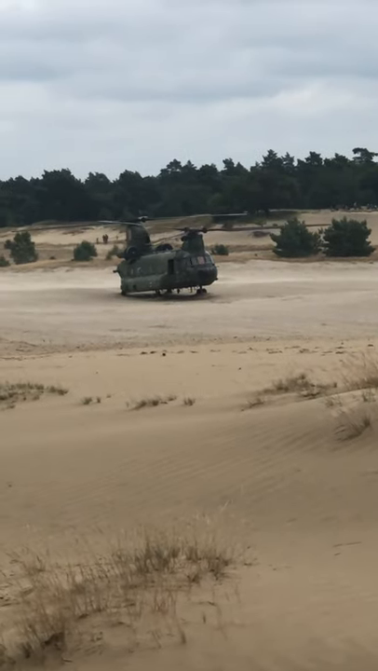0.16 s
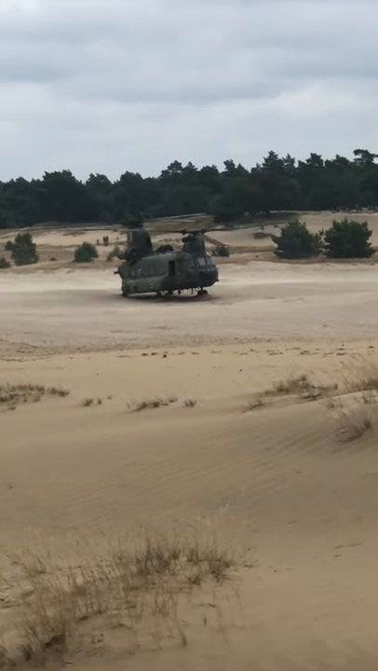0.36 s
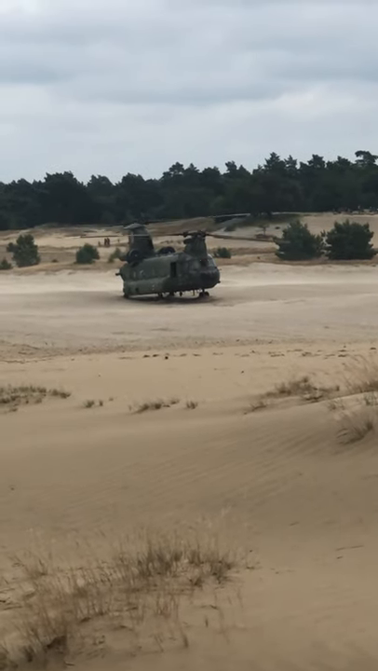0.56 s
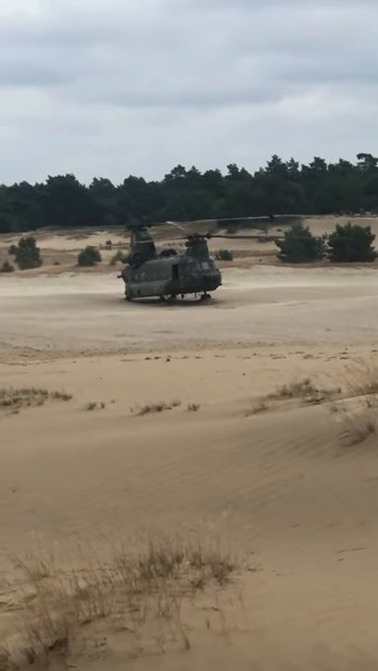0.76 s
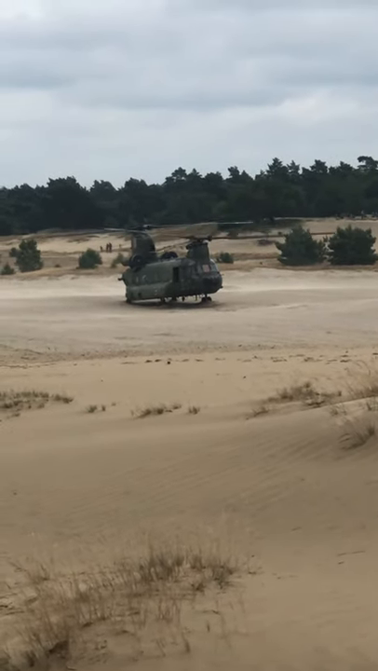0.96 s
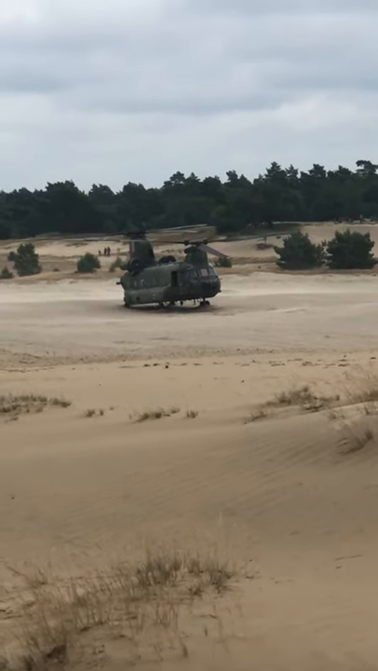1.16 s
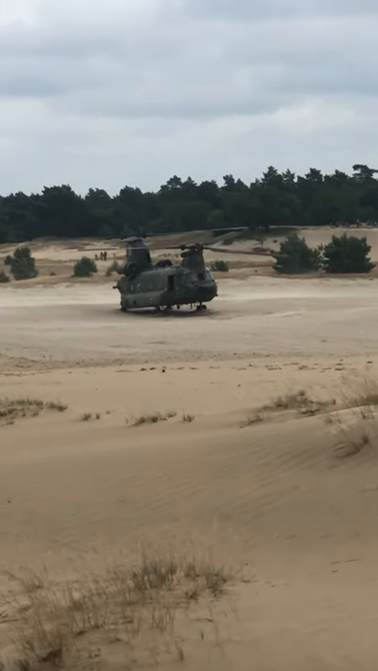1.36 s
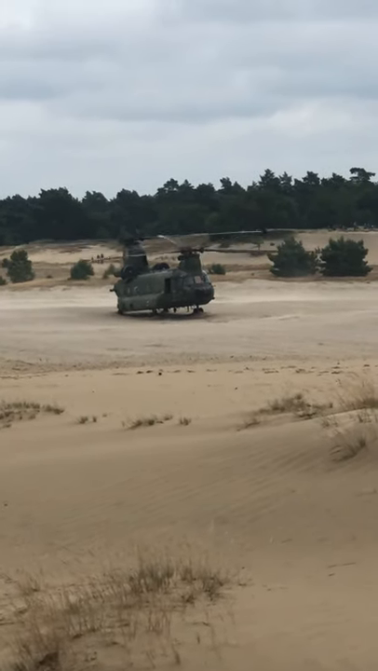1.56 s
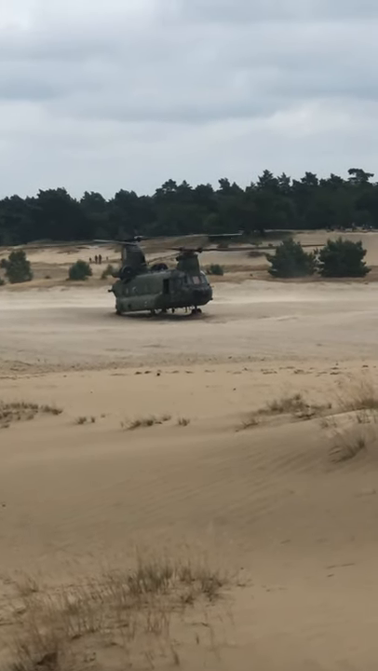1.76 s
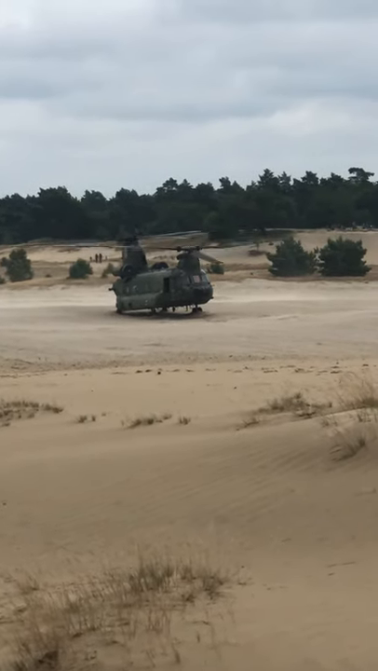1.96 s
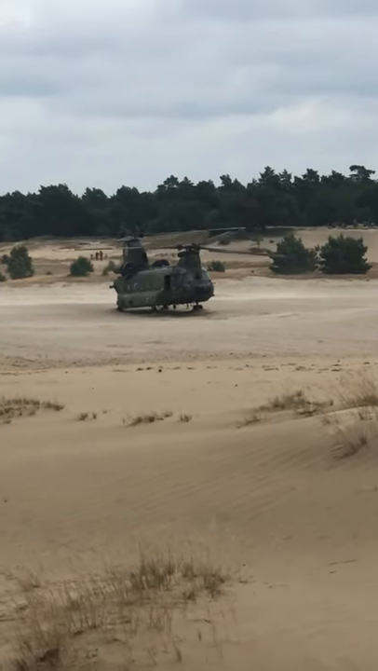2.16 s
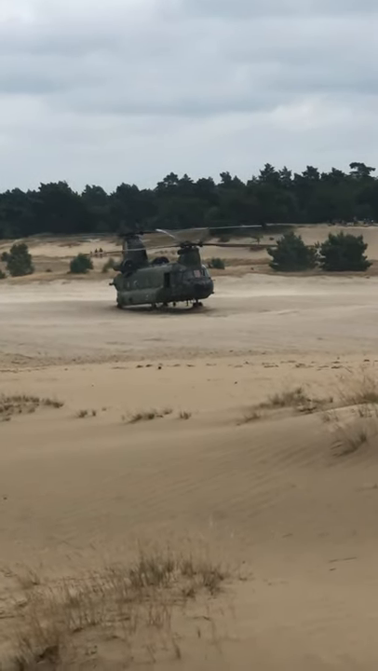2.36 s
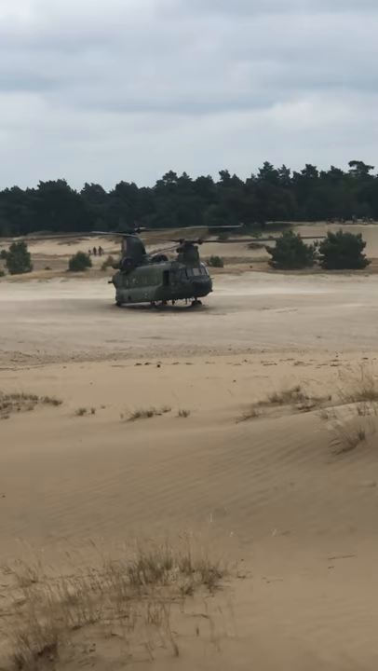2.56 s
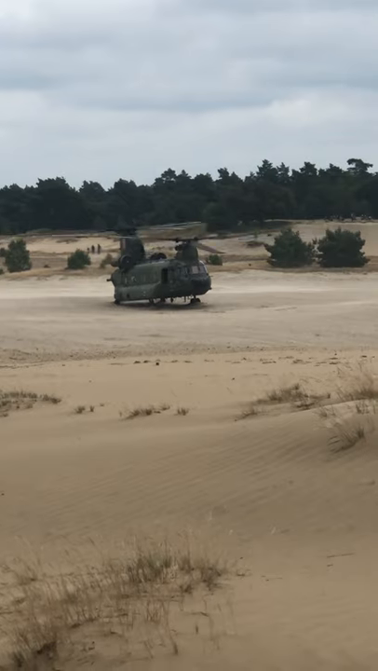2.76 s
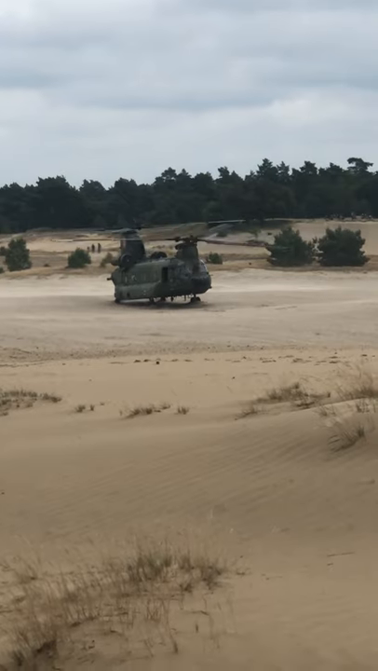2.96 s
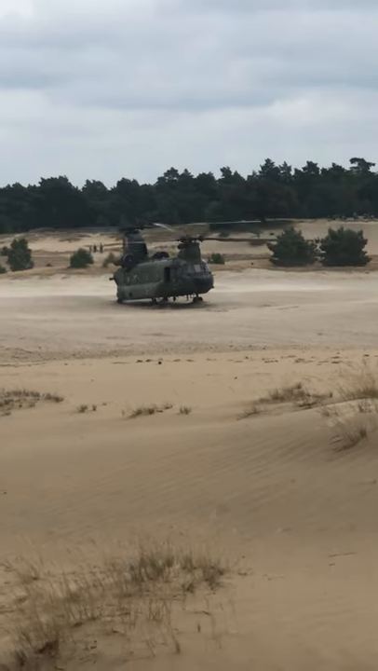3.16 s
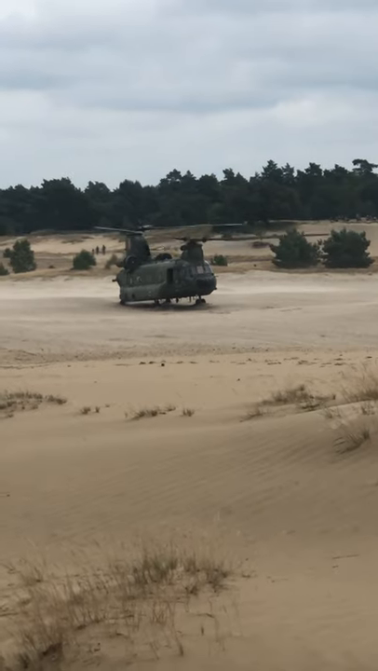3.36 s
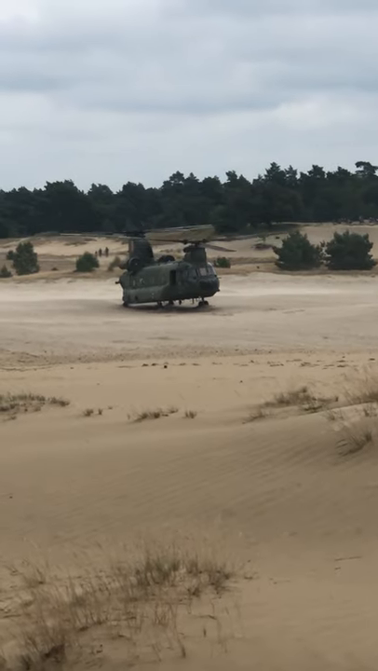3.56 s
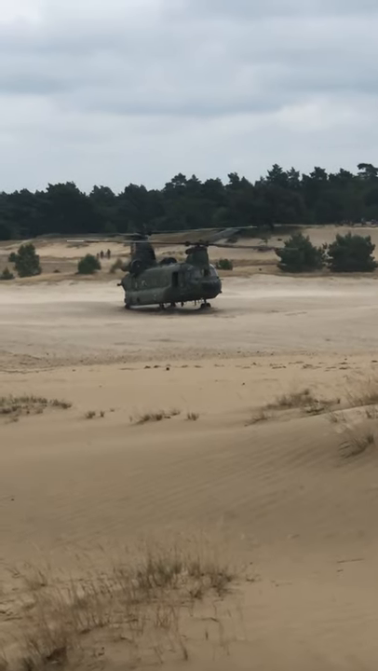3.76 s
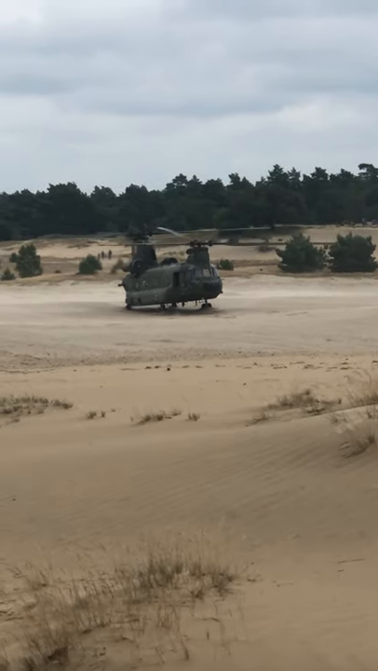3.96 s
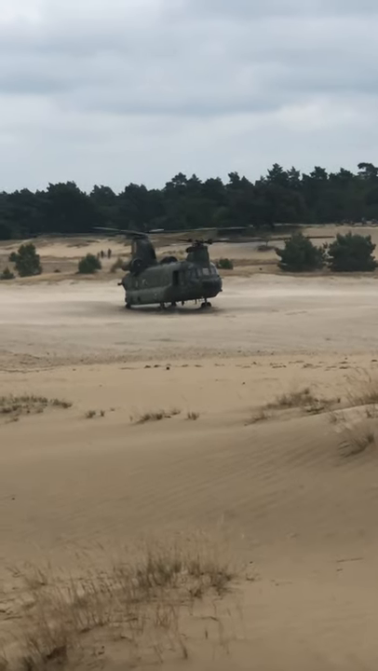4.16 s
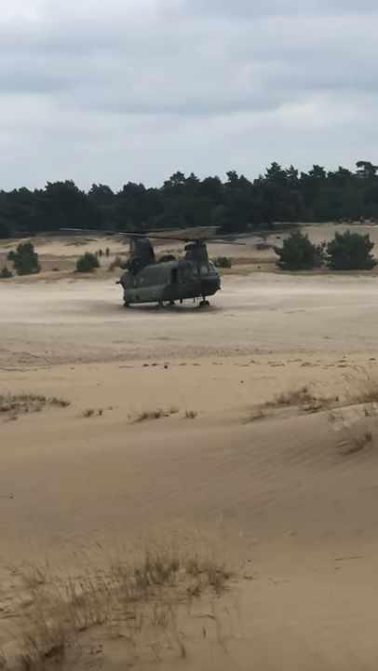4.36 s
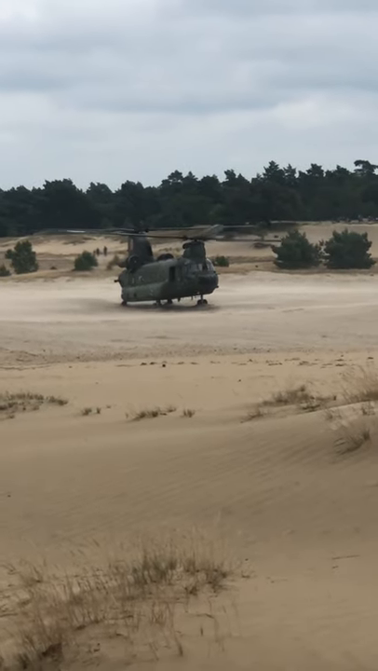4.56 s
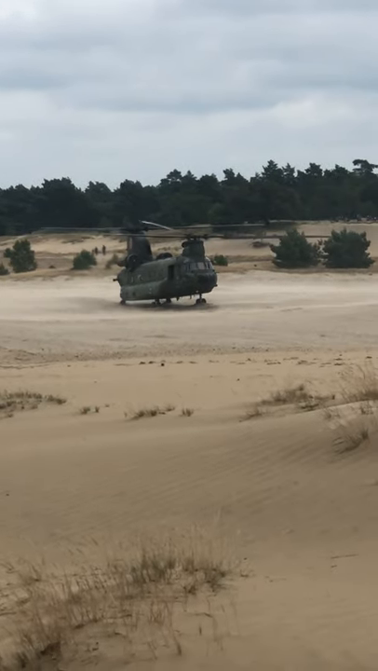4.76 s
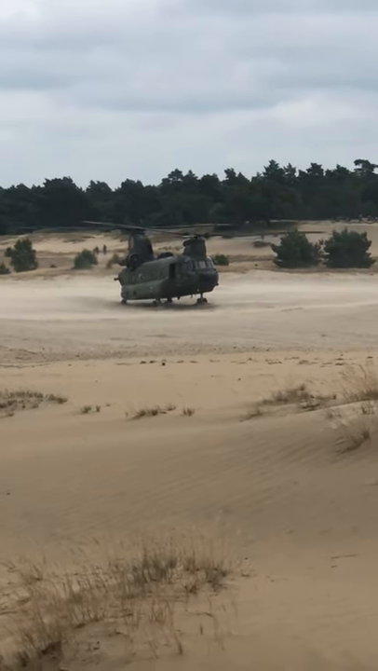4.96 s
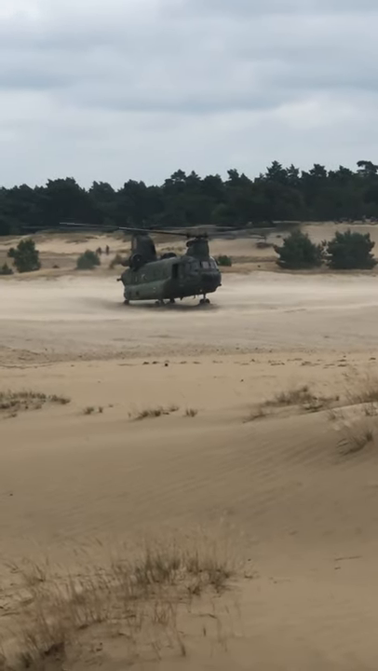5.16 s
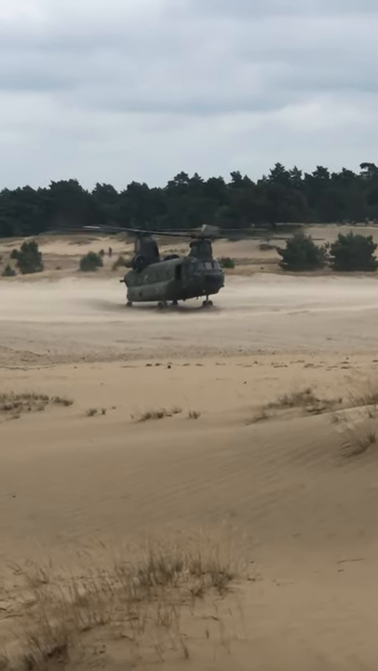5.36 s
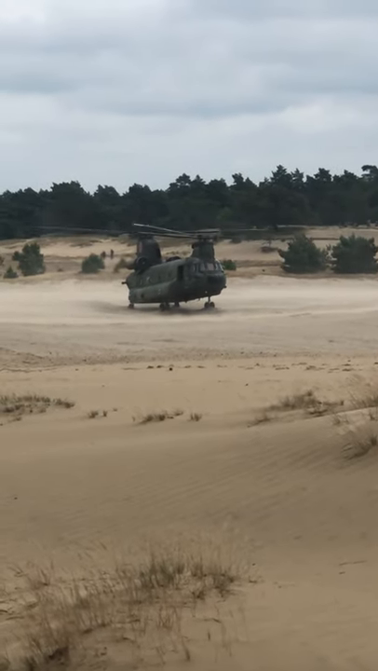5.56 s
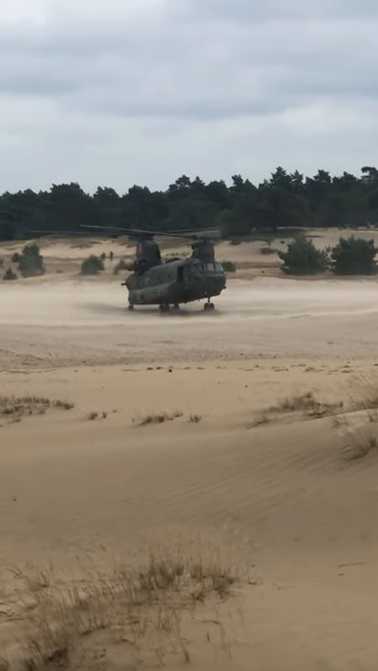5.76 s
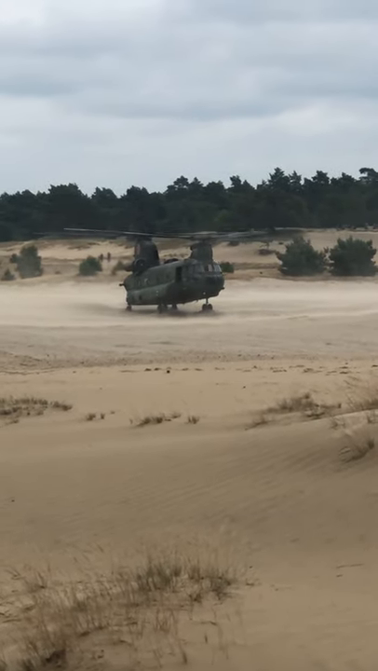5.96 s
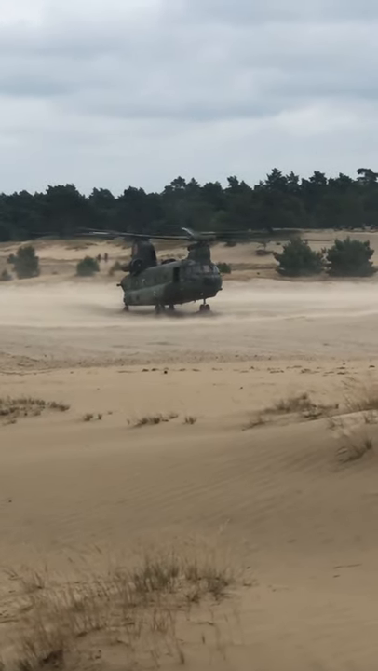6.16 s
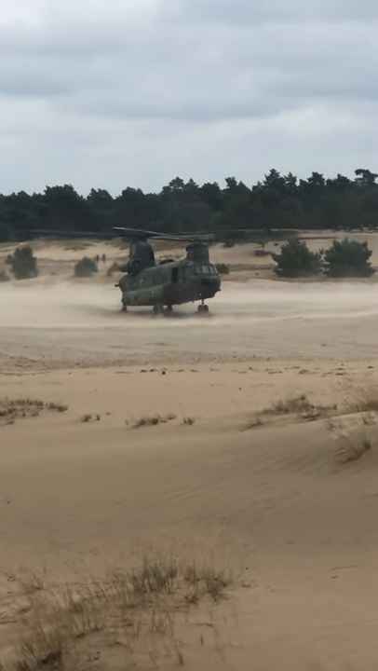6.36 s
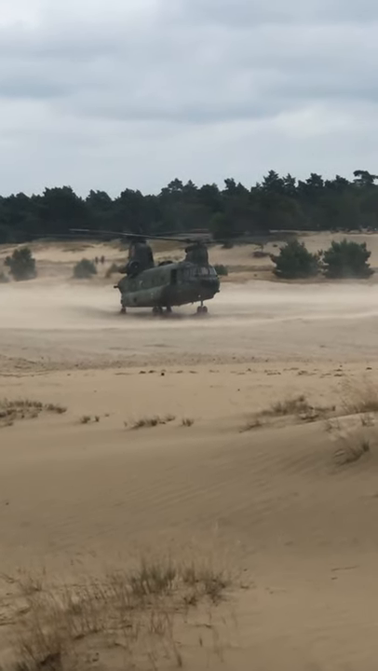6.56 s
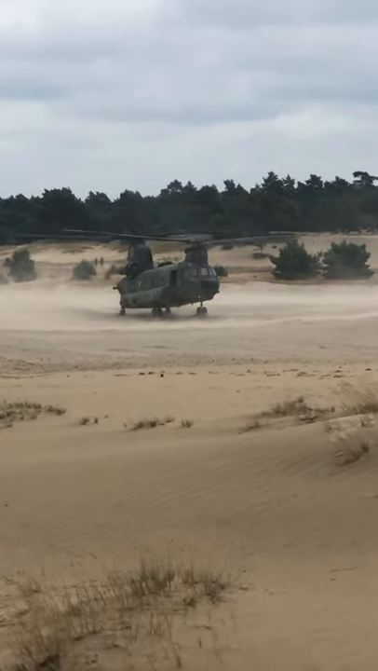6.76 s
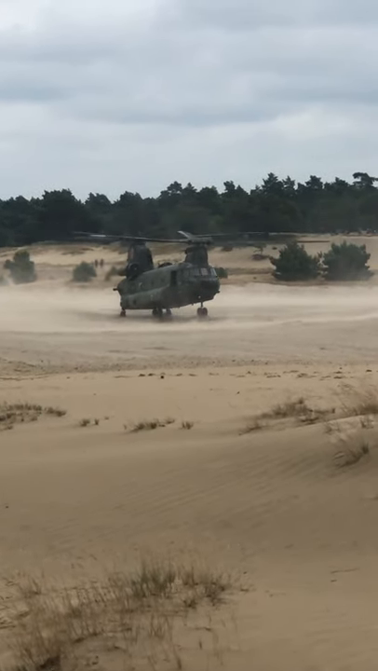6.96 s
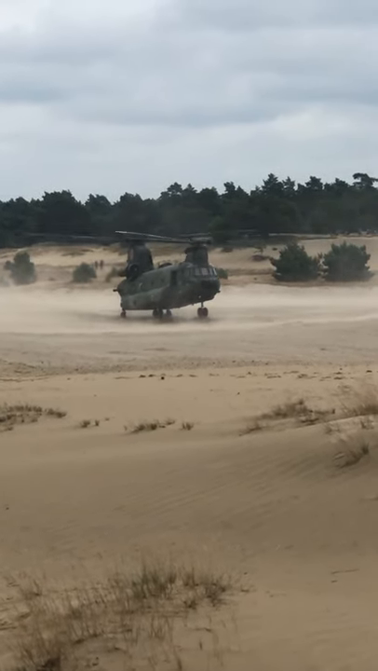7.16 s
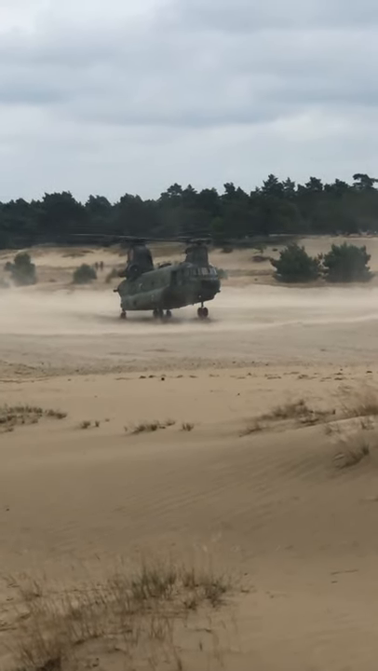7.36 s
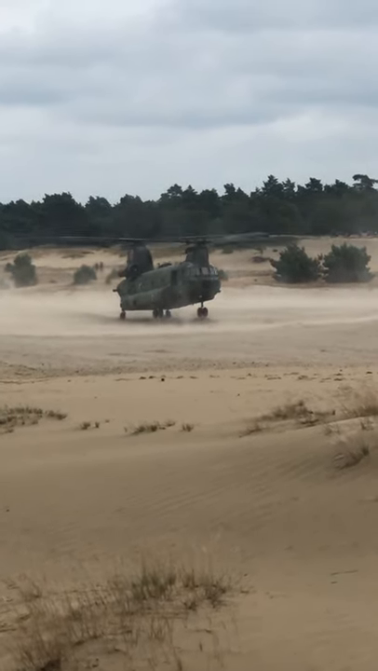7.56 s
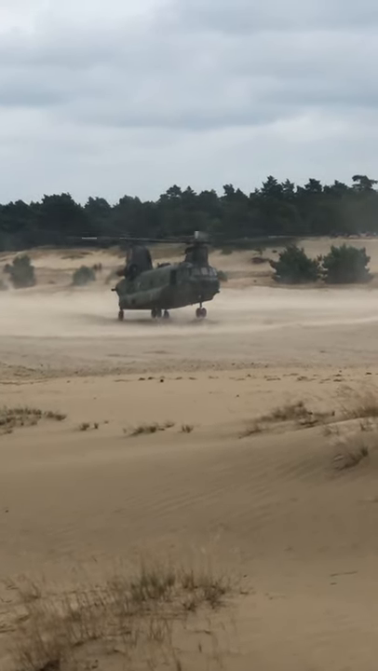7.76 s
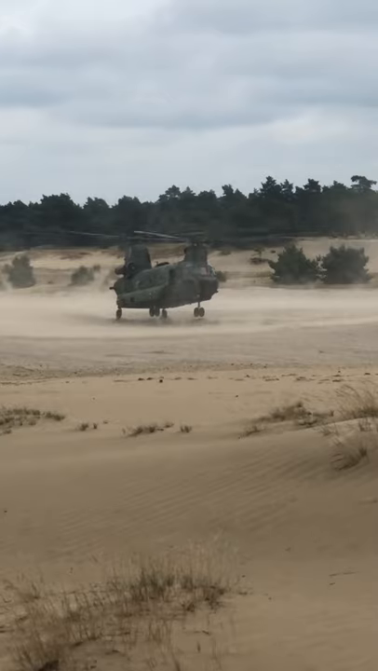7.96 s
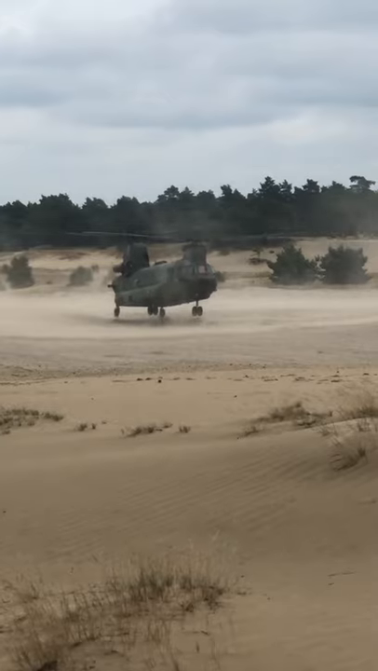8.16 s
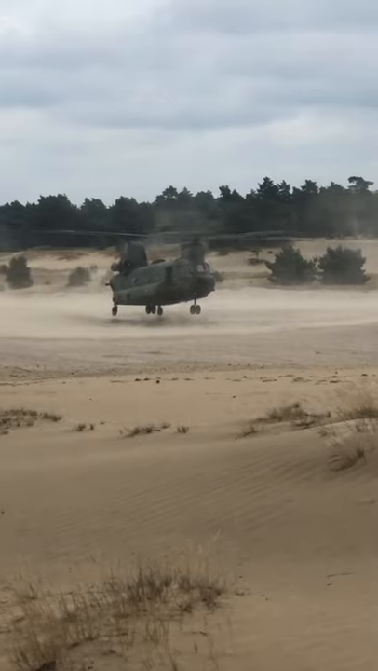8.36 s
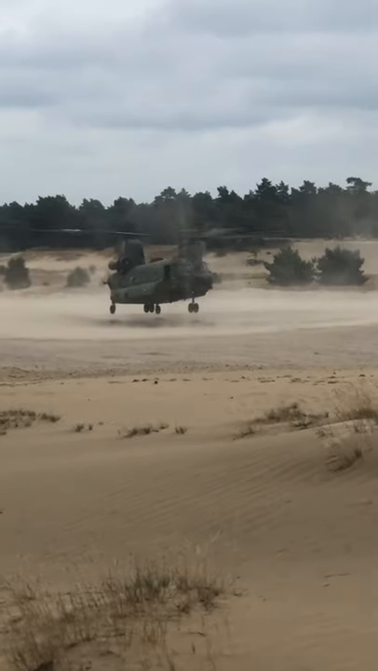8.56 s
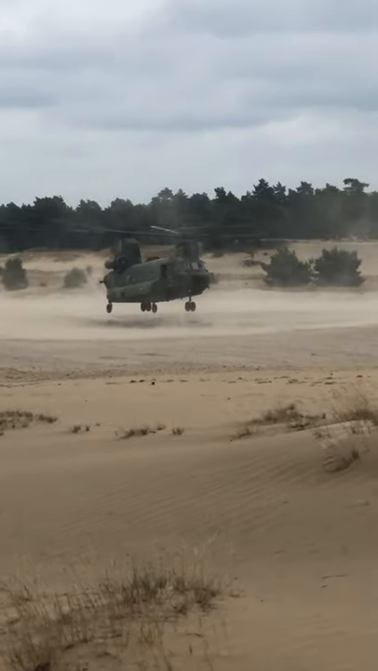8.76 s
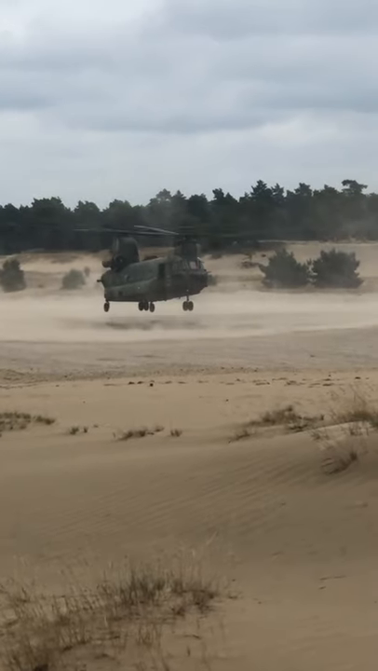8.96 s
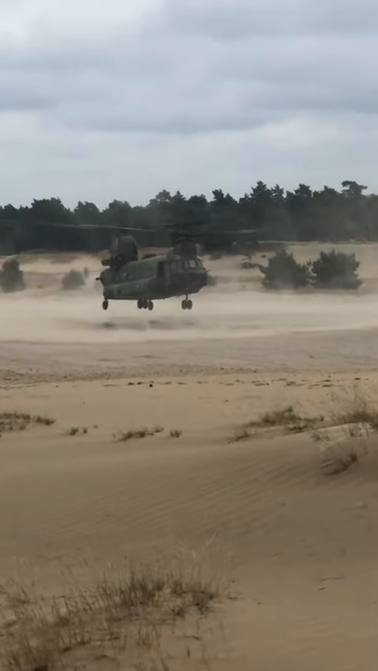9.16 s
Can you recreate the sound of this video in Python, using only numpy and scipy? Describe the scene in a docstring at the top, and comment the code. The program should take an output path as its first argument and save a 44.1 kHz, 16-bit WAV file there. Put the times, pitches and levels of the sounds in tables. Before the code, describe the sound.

A large twin-rotor helicopter beats steadily at about eleven thumps a second across open sand, whining and cracking, then swells deeper and heavier lifting off.

```python
"""Tandem-rotor helicopter lifting off

Some way off across sand dunes, the helicopter runs at full rotor speed, pulls power and lifts off.
Every blade pass brings a thump from each rotor, slaps where a blade cuts the other rotor's tip vortices,
and a wash of eddies that nearly repeats. Gearbox tones follow the rotor, the turbine whine climbs unevenly
and spreads with power, the exhausts hiss and sand blows in the downwash."""
import sys
import numpy as np
from scipy import signal
from scipy.fft import rfft, irfft, next_fast_len
from scipy.io import wavfile
from scipy.ndimage import uniform_filter1d

SR = 44100
rng = np.random.default_rng(int(sys.argv[2]) if len(sys.argv) > 2 else 0)


def unload_audio(sound):
    """Save the sound as a 16-bit wav file, at the path given as the first command line argument."""
    columns = np.transpose(np.atleast_2d(sound))
    # keep every value between -1 and 1, then stretch to whole-number steps
    steps = np.round(np.clip(columns, -1, 1) * 32767)
    wavfile.write(sys.argv[1], SR, steps.astype(np.int16))


N = 410130
TIME = np.arange(N) / SR  # s

# The power the pilot pulls, lightening the wheels and then lifting off.
# Each row: time in seconds, pull from 0 to 1.
PULL = [(0, 0.03), (3.9, 0.07), (4.7, 0.47), (5.7, 0.63), (6.3, 0.88), (7.45, 0.68), (8.05, 0.87),
        (8.6, 0.94), (9.3, 1)]
# Where in a blade pass the wake is met; it shifts as the discs tilt.
# Each row: time in seconds, then front thud, rear thud and slap in passes.
TIMING = [(0, 0.17, 0.51, 0.33), (3.6, 0.21, 0.5, 0.33), (4.2, 0.18, .6, .47), (5.1, 0.17, 0.61, 0.46),
          (5.7, .16, .44, .39), (7.1, 0.17, 0.44, 0.35), (7.75, .17, .61, .31), (8.2, 0.16, 0.55, .295),
          (8.6, 0.13, .56, .29), (9.3, 0.14, 0.53, 0.3)]
# Swing of the treble, shared by the top of the tearing, the exhaust hiss and the faint gear tones.
# Each row: time in seconds, level in relative dB.
TREBLE = [(0, 4.5), (.39, 1.5), (.6, 0), (2.2, 0), (3.6, -2), (5.6, -5.5), (6.4, -0.5), (7.7, 0),
          (9.3, 1.25)]
# Colour of torn air. Each row: frequency in Hz, relative level in dB.
TEAR = [(300, -12.5), (640, 6), (850, 7), (1300, -2.5), (2200, -14.5), (4000, -28.5), (8000, -40.5),
        (14000, -61.5)]
# Under load the blows grow compact: the clean pulse gains this much on its smear at full pull
FOCUS_DB = 5.5
# The blades meet the wake more or less squarely from moment to moment
WANDER_DB = 0.24


def blade_slaps(phase):
    """Blades cut tip vortices: a crack, two thuds and a slap in every pass, some hit harder than the rest."""
    # Blades that hit a vortex squarely. Each row: time in seconds, extra level in dB.
    square_hits = [(0.298, 1.5), (0.386, 0.5), (1.015, 1.5), (1.103, 3), (1.2, 2.5), (1.38, 1), (1.47, 4),
                   (2.0, 2.5), (2.53, 6.5), (2.62, 2.5), (3.211, 5.5), (3.39, 1), (4.806, 1), (4.895, 3.5),
                   (5.113, 5.5), (5.55, 5), (6.598, 4.5), (6.862, 4.5), (7.045, 5), (7.489, 4),
                   (7.577, 5.5), (7.69, 3), (7.755, 4), (7.842, 3), (7.87, 3), (7.931, 2), (8.028, 3.5),
                   (8.293, 1), (8.564, 1.5), (8.745, 1.5), (8.925, 0.5)]
    blows = cracks(phase) + thuds(phase) + slaps(phase) + lift_blows(phase)
    return blows * undb(accents(square_hits, width_s=0.014)) + snaps()


def cracks(phase):
    """A scuff and a swish, then a clean crack of fixed body colour whose bright edge changes over time."""
    # The crack is strongest while the aircraft is light on its wheels.
    # Each row: time in seconds, level of the crack group in dB, lift of its bright edge in dB.
    cracking = [(0, -40.5, 4), (2.4, -45, -4.5), (3.55, -48, 16.5), (4.15, -31, -15), (4.75, -30, -10),
                (5.4, -30, -13.5), (6.3, -34, -6), (6.7, -33.5, 4.5), (7.2, -29, -13), (7.6, -42, -5),
                (9.3, -42, -9.5)]
    # Colour of the crack. Each row: frequency in Hz, relative level in dB.
    crack_colour = [(60, -27.5), (150, -1), (300, 8), (480, 7), (680, -7), (900, -6), (1400, -19),
                    (2400, -37.5), (5000, -62)]
    level_db, edge_db = curves(cracking)
    # grazing over soft sand delays the lows, so each crack is a short falling chirp
    crack = colour(pulses(phase, at=.077, jitter=.004, scatter_db=1), crack_colour, lag_s=.0045)
    smear = colour(wake(phase, memory=0.21) * sweep(phase, at=0.074, width=.022), crack_colour)
    scuff = colour(wake(phase, memory=0.19) * sweep(phase, at=0.99, width=.055), crack_colour)
    blow = brighten(undb(-7) * crack + undb(-15.0) * smear, edge_db, edge_hz=720)
    swish = colour(rng.standard_normal(N) * sweep(phase, at=0.04, width=0.068), TEAR)
    swish_db = -54 - 5.3 * curves(PULL)[0] + 2 * walk(14)
    return (blow + undb(-15) * scuff) * undb(level_db) + swish * undb(swish_db)


def thuds(phase):
    """A dull blow from each rotor, smeared by ground and fuselage; the front one repeats more closely."""
    # Front rotor. Each row: time in seconds, level in dB ahead of the mix of pulse and smear.
    front_level = [(0, -46), (3.9, -41.5), (4.7, -36.5), (5.7, -29.5), (7.5, -29.5), (8.2, -29.5),
                   (8.6, -31), (9.3, -43)]
    # The rear rotor thuds whenever it runs in the wake of the front one.
    # Each row: time in seconds, level in dB ahead of the mix of pulse and smear.
    rear_level = [(0, -58), (.9, -46), (1.15, -32), (1.5, -32), (1.8, -45), (2.35, -41), (2.6, -32.5),
                  (2.9, -34.5), (3.3, -41.5), (4.1, -46), (4.5, -37), (5.1, -30.5), (6, -34), (7.1, -33),
                  (7.75, -33), (8.4, -30.5), (9.3, -25.5)]
    front_at, rear_at, _ = curves(TIMING)
    focus = undb(FOCUS_DB * curves(PULL)[0] / 2)
    # a blade crosses two turns of the vortex in a row: (delay in passes, share)
    turns = [(0, 1), (.06, .5)]
    front_push = sum(share * pulses(phase, front_at + delay, jitter=.003, scatter_db=1)
                     for delay, share in turns)
    front_smear = thud(wake(phase, memory=0.8) * sweep(phase, front_at, width=0.08))
    front = undb(-3) * thud(front_push) * focus + undb(-5) * front_smear / focus
    rear_push = pulses(phase, rear_at, jitter=.014, scatter_db=1.5)
    rear_smear = thud(wake(phase, memory=0.35) * sweep(phase, rear_at, width=0.076))
    rear = undb(-4.0) * thud(rear_push) + undb(-2.0) * rear_smear
    front_db = curves(front_level)[0] + WANDER_DB * walk(9.3)
    return front * undb(front_db) + rear * undb(curves(rear_level)[0])


def thud(push):
    """A dull blow whose pitch rises with the load on the blades."""
    # A lightly loaded blade thuds lower than one that is pulling hard.
    # Each row of both: frequency in Hz, relative level in dB.
    light = [(30, -37.5), (60, -15), (115, 5), (155, 3), (230, -4.5), (300, -27), (500, -32.5),
             (1200, -60.5)]
    loaded = [(30, -37.5), (60, -14.5), (115, -7.5), (180, 1), (230, -1.5), (300, -16.5), (500, -26),
              (1200, -62)]
    load = np.clip(0.22 + 0.48 * curves(PULL)[0], 0, 1)
    return unit((1 - load) * colour(push, light) + load * colour(push, loaded))


def slaps(phase):
    """A ragged slap with a tearing edge, a quick run of small shocks."""
    # The slap grows as the rotors take the weight.
    # Each row: time in seconds, level in dB ahead of the mix of strike and smear.
    slapping = [(0, -50.5), (2.5, -39), (3.6, -47.5), (4.9, -36.5), (5.7, -37.5), (7.3, -36.5), (8, -29),
                (9.3, -29)]
    # The tearing comes and goes with the wake. Each row: time in seconds, level in dB.
    tearing = [(0, -52.5), (.38, -48), (.55, -49.5), (.8, -51), (1.05, -45.5), (1.25, -49.5), (1.45, -52.5),
               (1.95, -49.5), (2.7, -65.5), (3.8, -57), (4.2, -47), (5.5, -62), (5.95, -52), (6.55, -48),
               (7.45, -50.5), (7.7, -61.5), (8.05, -50.5), (9.05, -47), (9.3, -53)]
    # Colour of the slap. Each row: frequency in Hz, relative level in dB.
    slap_colour = [(80, -32.5), (220, 3.5), (380, 2.5), (480, 4), (590, -0.5), (700, -19.5), (900, -19),
                   (1600, -43)]
    slap_at = curves(TIMING)[2]
    pull = curves(PULL)[0]
    focus = undb(FOCUS_DB * pull / 2)
    strike = colour(pulses(phase, slap_at, jitter=.007, scatter_db=1.2), slap_colour, lag_s=.006)
    smear = colour(wake(phase, memory=0.58) * sweep(phase, slap_at + .04, width=0.061), slap_colour)
    slap = undb(-8.0) * strike * focus + undb(-4.0) * smear / focus
    slap_db = curves(slapping)[0] + WANDER_DB * walk(3.1)

    shocks = rng.standard_normal(N) * (rng.random(N) < 4000 / SR)  # 4000 a second ahead of the gate
    tear = colour(shocks * sweep(phase, at=0.35, width=0.072 + 0.022 * pull), TEAR, lag_s=0.00296)
    # the top of the tearing swings further than the shared treble: 3 dB per dB
    tear = brighten(tear, 3 * curves(TREBLE)[0], edge_hz=1330)
    return slap * undb(slap_db) + tear * undb(curves(tearing)[0])


def lift_blows(phase):
    """With full weight on the rotors each pass lands a compact blow; a brief shudder and round boom follow."""
    # Each row: time in seconds, level in dB of blow and shudder, ahead of the lift-off fade.
    lifting = [(7.3, -46), (7.55, -34), (7.84, -32), (7.93, -26.5), (8.02, -25.5), (8.11, -23),
               (8.2, -26.5), (8.47, -25.5), (8.56, -28.5), (8.85, -30), (9.3, -28)]
    # Colours of the blow and of the boom. Each row of both: frequency in Hz, relative level in dB.
    blow_colour = [(35, -18), (70, -3), (120, 1.5), (165, 2.5), (250, -4), (340, -15), (520, -23),
                   (900, -44)]
    boom_colour = [(40, -24.5), (68, 5), (100, -1), (140, -7.5), (260, -24)]
    lift_start_s, lift_rise_s = 7.31, 0.65
    airborne = np.clip((TIME - lift_start_s) / lift_rise_s, 0, 1)
    blow = colour(pulses(phase, at=.28, jitter=.003, scatter_db=.6), blow_colour)
    shudder = undb(-3) * colour(wake(phase, memory=.3) * sweep(phase, at=.38, width=.055), blow_colour)
    boom = colour(wake(phase, memory=.5) * sweep(phase, at=.54, width=.1), boom_colour)
    return airborne * ((blow + shudder) * undb(curves(lifting)[0]) + boom * undb(-33.5))


def snaps():
    """Single sharp cracks: a bright front, and a rounder body that the sand delays."""
    # Each row: time in seconds, peak of the front in dB, its centre frequency in Hz.
    fronts = [(2.498, -39, 1000), (4.453, -33, 1120), (4.541, -28.5, 700), (4.631, -35, 900),
              (4.718, -33, 1330), (4.807, -33, 840), (4.895, -30, 740), (4.984, -32, 1000),
              (5.072, -26.5, 890), (5.337, -39, 890), (5.778, -34, 800), (5.867, -31, 800),
              (6.042, -32, 800), (6.597, -42, 1200), (7.044, -36, 840), (7.193, -38, 990),
              (7.307, -36, 1040)]
    body_hz, body_db, lag_s = 520, -26, 0.001296
    return sum(undb(db) * shock(s, hz) + undb(body_db) * shock(s + lag_s, body_hz) for s, db, hz in fronts)


def shock(s, hz):
    """A rise and fall of pressure around time s; the shorter it is, the brighter."""
    u = np.clip(2 * np.pi * hz * (TIME - s), -10, 10)
    return -u * np.exp((1 - u ** 2) / 2)


def rotor_thump(phase):
    """The lift of the two rotors thumps once each in every pass, louder as the aircraft leaves the ground."""
    # Colour of the thump. Each row: frequency in Hz, relative level in dB.
    thump_colour = [(10, -49.5), (22, -30.5), (33, -9.5), (45, -2.5), (56, 5.5), (70, -3), (90, -7),
                    (130, -14.5), (300, -58.5)]
    start_db, rise_start_s, rise_db_per_s = -35.5, 5.4, 1
    front = pulses(phase, at=.27, jitter=.003, scatter_db=.8)
    rear = pulses(phase, at=.56, jitter=.003, scatter_db=.8)
    thump_db = start_db + rise_db_per_s * np.maximum(TIME - rise_start_s, 0)
    return colour(undb(-0.5) * front + rear, thump_colour) * undb(thump_db)


def rotor_wash(phase):
    """The wake of the rotors rumbles and roars in turbulent surges, one for each blade pass."""
    # Colours of rumble and roar. Each row of both: frequency in Hz, relative level in dB.
    eddy_colour = [(22, -36), (45, -13.5), (68, -1), (120, 2.5), (170, 1), (220, -4), (300, -18.5),
                   (600, -36.5)]
    roar_colour = [(100, -17.5), (260, 4), (430, 2.5), (560, -2), (690, -7.5), (880, -9.5), (1150, -17.5),
                   (1700, -24.5), (2400, -41), (5000, -49)]
    # Laws for the levels ahead of the surge, and for its height: dB at no pull, added dB at full pull.
    wash_law = (-33.3, -2)
    roar_law = (-41.5, 2.5)
    surge_law = (4.5, 8)
    surge_db = follow(PULL, surge_law) * sweep(phase, at=0.37, width=0.32)
    wash = colour(wake(phase, memory=0.45), eddy_colour) * undb(follow(PULL, wash_law) + surge_db)
    roar_db = follow(PULL, roar_law) + 0.62 * surge_db + 1.0 * walk(25)
    return wash + colour(wake(phase, memory=0.35), roar_colour) * undb(roar_db)


def exhaust_hiss():
    """Turbulent exhaust gas makes a broad hiss that wanders in level and follows the shared treble."""
    # Colour of the hiss. Each row: frequency in Hz, relative level in dB.
    hiss_colour = [(500, -0.5), (1800, 6), (2600, 0.5), (3600, -2.5), (4600, -6.5), (5400, -7.5),
                   (6200, -11.5), (8300, -15.5), (10500, -23.5), (15000, -31.5)]
    # Level law: base in dB, then dB per dB of treble.
    hiss_law = (-58, 0.6)
    return colour(rng.standard_normal(N), hiss_colour) * undb(follow(TREBLE, hiss_law) + 0.59 * walk(9))


def gearbox(speed):
    """Gear teeth sing in step with the rotors: three clear mesh tones and two faint blurred ones."""
    # Clear tones. Each row: frequency in Hz at the first rotor speed, pitch wobble in Hz.
    mesh_tones = [(1452, 14), (1790, 5), (3570, 11)]
    # Their mean levels. Each row: time in seconds, then low, middle and high tone in dB.
    mesh_levels = [(0, -56.5, -58, -70), (.4, -64, -66, -79), (1.1, -61.5, -67.5, -74),
                   (2.2, -66, -73, -77), (3.1, -63, -71.5, -78), (4.3, -66, -67.5, -78),
                   (5.4, -68.5, -77.5, -79), (7, -64, -73.5, -72.5), (7.9, -68.5, -73, -77.5),
                   (9.3, -61, -67, -78)]
    # Blurred tones. Each row: frequency in Hz at the first rotor speed, width in Hz,
    # level in dB ahead of the treble swing.
    blurred_tones = [(3335, 90, -80), (5365, 130, -81)]
    mesh = sum(whistle(hz * speed, wobble) * undb(db + 2.2 * walk(6))
               for (hz, wobble), db in zip(mesh_tones, curves(mesh_levels)))
    others = sum(tone(hz * speed, width) * undb(db + 1.5 * walk(8)) for hz, width, db in blurred_tones)
    return mesh + others * undb(0.37 * curves(TREBLE)[0])


def turbines():
    """The compressor blades whine: a narrow core in a skirt that gains on it as the engines spool up."""
    # Each row: time in seconds, blade tone in Hz, relative level in dB.
    compressor = [(0, 6640, -68), (3.45, 6640, -70), (4.2, 6870, -71.5), (5.05, 7060, -72),
                  (5.8, 7000, -69.5), (6.9, 6900, -68), (7.5, 7020, -66.5), (8.1, 7120, -66),
                  (9.3, 7400, -64.5)]
    hz, db = curves(compressor)
    power = (hz - hz.min()) / np.ptp(hz)
    spread = np.clip(0.12 + 0.5 * power, 0, 1)
    core = unit(tone(hz, width_hz=98) + whistle(hz, wobble_hz=23.9))
    whine = np.sqrt(1 - spread) * core + np.sqrt(spread) * tone(hz, width_hz=400)
    skirt = tone(hz, width_hz=800) * undb(-13 + 3 * power)
    # gusts on the long path make the whine flutter
    return (whine + skirt) * undb(db + 1.0 + .5 * walk(12))


def blown_sand(phase):
    """Sand grains hiss in gusts, faint until the downwash lifts more, surging with each blade pass."""
    # Colour of the sand. Each row: frequency in Hz, relative level in dB.
    grit = [(2000, -10), (4500, 5), (7000, -2), (9000, -6), (11000, -18.5), (15000, -27)]
    start_s, rise_s = 5, 0.98
    lifted = np.interp(TIME, [start_s, start_s + rise_s], [.2, 1])
    surge_db = 5 * sweep(phase, at=.35, width=.13)
    return colour(rng.standard_normal(N), grit) * lifted * undb(-71.5 + surge_db + 2.3 * walk(7.3))


def pulses(phase, at, jitter, scatter_db):
    """One pressure pulse in every blade pass, at the given point of it, each a little off in time and size."""
    passes = np.arange(int(phase[-1]) + 1)
    chance = rng.standard_normal((len(passes), 2))
    moments = passes + jitter * chance[:, 0]
    place = np.interp(moments, phase - at, np.arange(N), left=-1, right=-1).astype(int)
    heard = place >= 0
    out = np.zeros(N)
    # tanh holds back the rare extremes
    out[place[heard]] = undb(scatter_db * np.tanh(chance[heard, 1] / 2) * 2)
    return out


def wake(phase, memory):
    """Turbulence that every blade finds partly as the blade before it did; memory is the share that stays."""
    memory = np.clip(memory, 0, .97)
    size = 4096  # points in one pass
    eddies = rng.standard_normal((int(phase[-1]) + 2, size))
    for k in range(1, len(eddies)):
        eddies[k] = memory * eddies[k - 1] + np.sqrt(1 - memory ** 2) * eddies[k]
    return np.interp(phase * size, np.arange(eddies.size), eddies.ravel())


def sweep(phase, at, width):
    """A smooth gate that opens once in every blade pass; place and width in passes."""
    offset = (phase - at + .5) % 1 - .5
    return np.exp(-.5 * (offset / width) ** 2)


def tone(hz, width_hz):
    """A tone blurred into a narrow band by turbulent air."""
    low_pass = signal.butter(2, width_hz / 2, fs=SR, output="sos")
    blur = signal.sosfilt(low_pass, rng.standard_normal((2, N)))
    angle = 2 * np.pi * np.cumsum(hz) / SR
    return unit(blur[0] * np.cos(angle) + blur[1] * np.sin(angle))


def whistle(hz, wobble_hz):
    """A tone of steady strength whose pitch trembles."""
    return unit(np.cos(2 * np.pi * np.cumsum(hz + wobble_hz * walk(70)) / SR))


def colour(x, points, lag_s=0):
    """Give x a spectrum of (Hz, dB) points that falls away past the last; the lows come lag_s late; rms 1."""
    size = next_fast_len(N + SR)
    hz, db = np.transpose(points)
    f = np.maximum(np.fft.rfftfreq(size, 1 / SR), 1)
    gain = undb(np.interp(np.log(f), np.log(hz), db)) / np.maximum(f / hz[-1], 1) ** 2
    delay = lag_s / (1 + (f / 400) ** 2)
    # the delay summed over frequency is the phase turn
    turn = np.exp(-2j * np.pi * np.cumsum(delay) * SR / size)
    return unit(irfft(rfft(x, size) * gain * turn, size)[:N])


def brighten(x, db, edge_hz):
    """Raise the part of x above edge_hz by db."""
    high_pass = signal.butter(3, edge_hz, "high", fs=SR, output="sos")
    return x + signal.sosfiltfilt(high_pass, x) * (undb(db) - 1)


def accents(table, width_s):
    """A short rise in dB around each listed moment."""
    return sum(db * np.exp(-((TIME - s) / width_s) ** 2) for s, db in table)


def walk(rate):
    """Random levels held 1 / rate s and slewed twice; rms 1."""
    k = int(SR / rate)
    steps = np.repeat(rng.standard_normal(N // k + 1), k)
    return unit(uniform_filter1d(uniform_filter1d(steps, k), k)[:N])


def follow(table, law):
    """A level in dB that follows a control curve by a straight law (base, slope)."""
    return law[0] + law[1] * curves(table)[0]


def curves(table):
    """Each column of a table as a line through time."""
    s, *columns = np.transpose(table)
    return [np.interp(TIME, s, c) for c in columns]


def unit(x):
    """Scale to rms 1."""
    return x / np.sqrt(np.mean(np.abs(x) ** 2))


def undb(db):
    """Decibels to gain."""
    return 10 ** (np.asarray(db) / 20)


def scene():
    """One rotor speed drives blades and gears; all sources sum at one distant microphone."""
    # Rotor speed. Each row: time in seconds, blade passes per second.
    rotor = [(0.0, 11.239), (1.5, 11.238), (2.4, 11.257), (3.2, 11.248), (4.0, 11.265), (5.0, 11.296),
             (6.0, 11.332), (6.6, 11.318), (7.2, 11.209), (7.8, 11.181), (8.4, 11.09), (9.3, 11.169)]
    rate, = curves(rotor)
    phase = np.cumsum(rate) / SR  # blade passes so far
    rotors = blade_slaps(phase) + rotor_thump(phase) + rotor_wash(phase)
    engines = exhaust_hiss() + gearbox(rate / rate[0]) + turbines()
    return (rotors + engines + blown_sand(phase))[None]


def record(dry):
    """The microphone cuts the deepest bass, which rings on a little, and the top."""
    low_cut_hz, top_hz = 32, 15700
    dry = signal.sosfilt(signal.butter(4, low_cut_hz, "high", fs=SR, output="sos"), dry)
    return signal.sosfilt(signal.ellip(8, .2, 70, top_hz, fs=SR, output="sos"), dry)


dry = scene()
out = record(dry)
unload_audio(out)
```